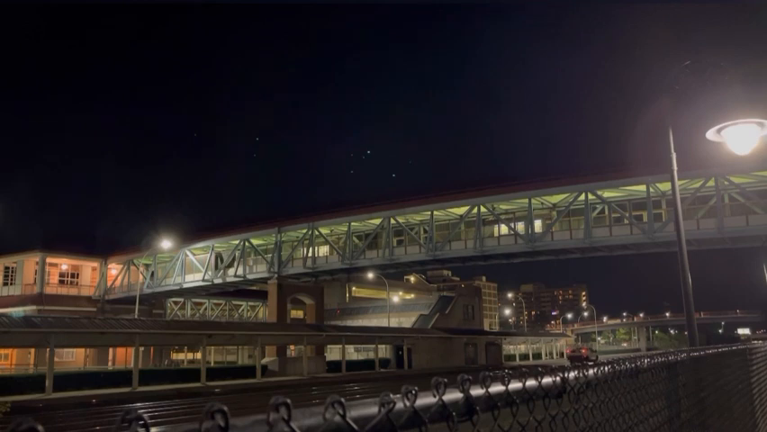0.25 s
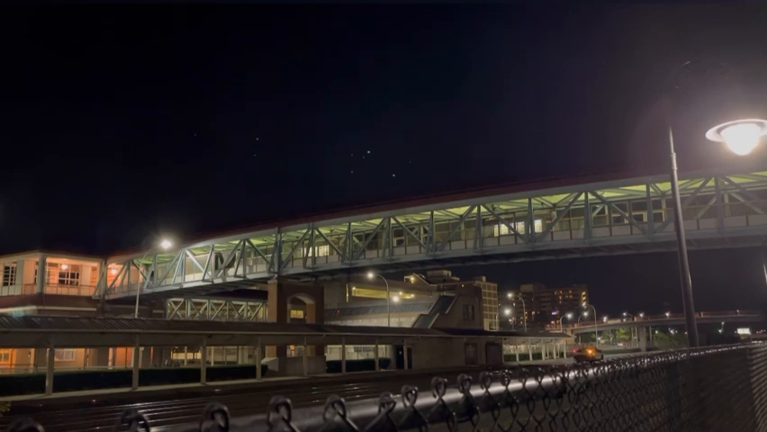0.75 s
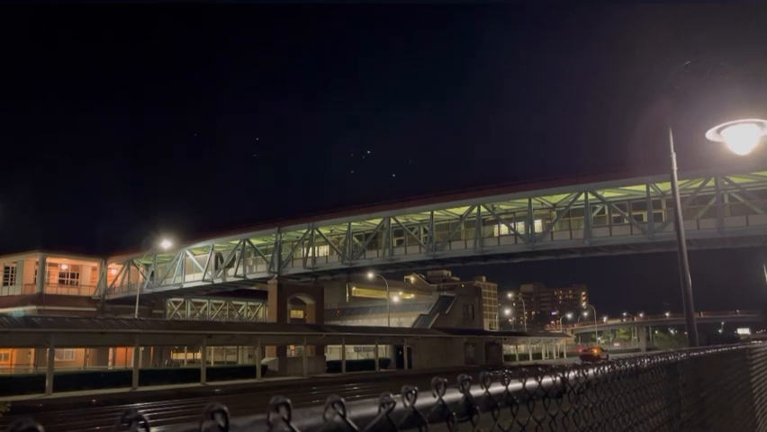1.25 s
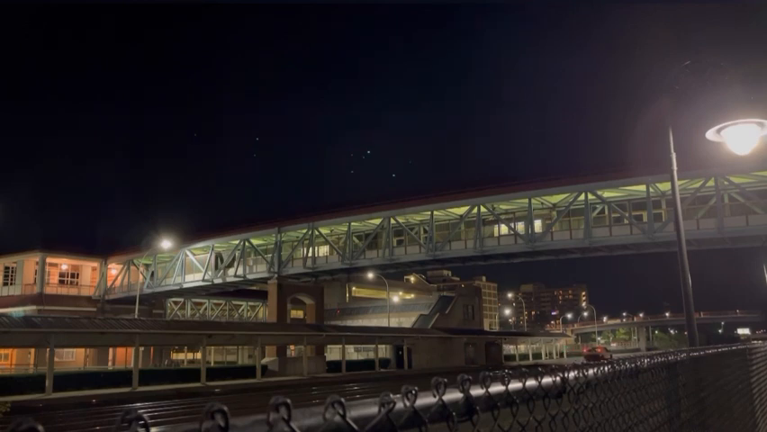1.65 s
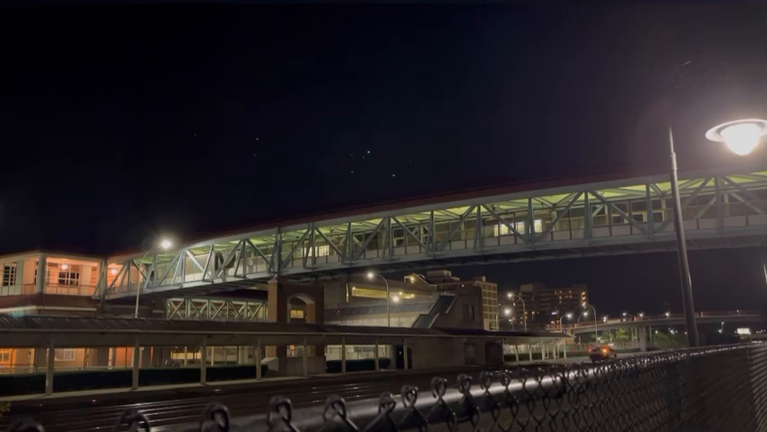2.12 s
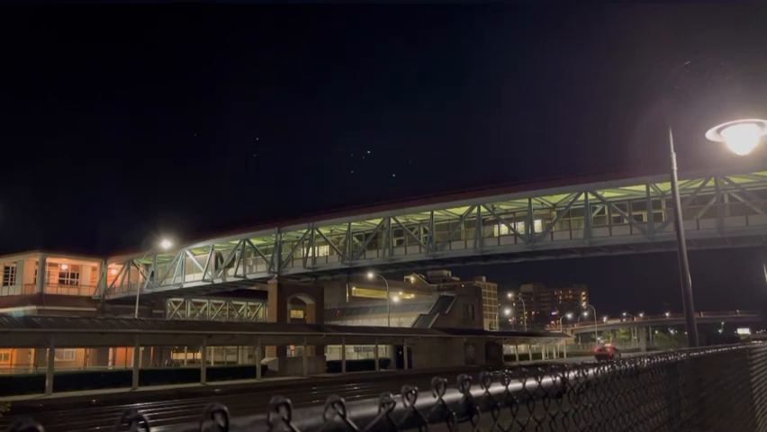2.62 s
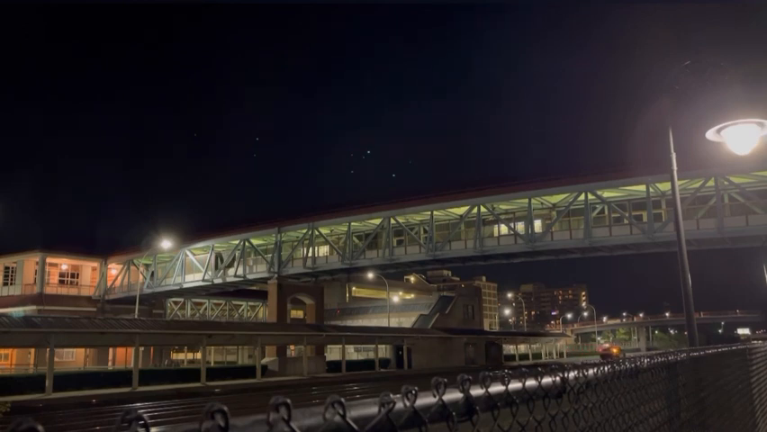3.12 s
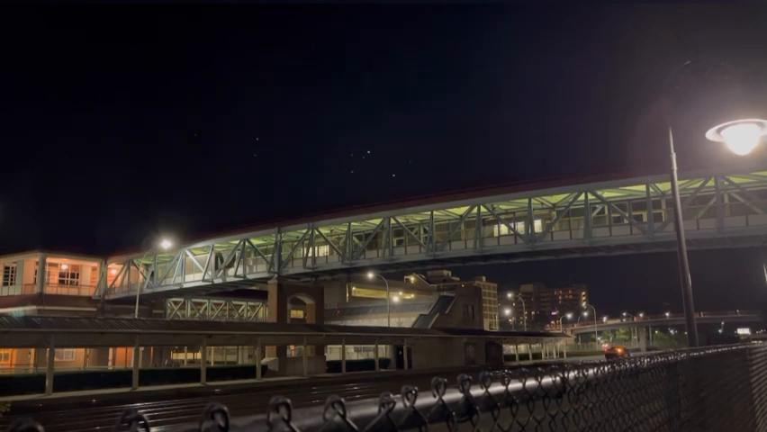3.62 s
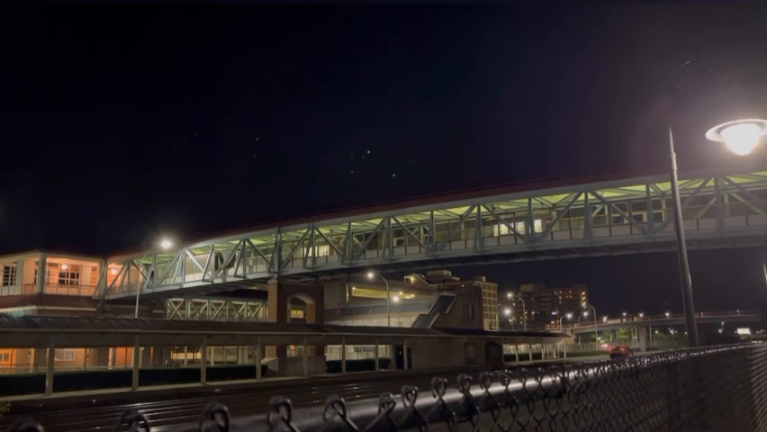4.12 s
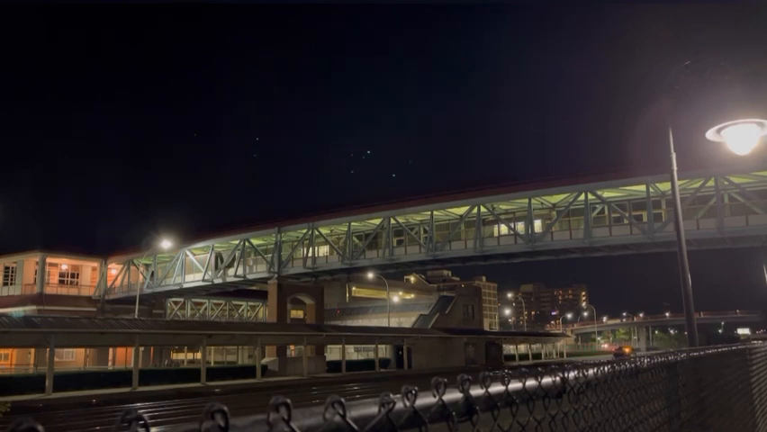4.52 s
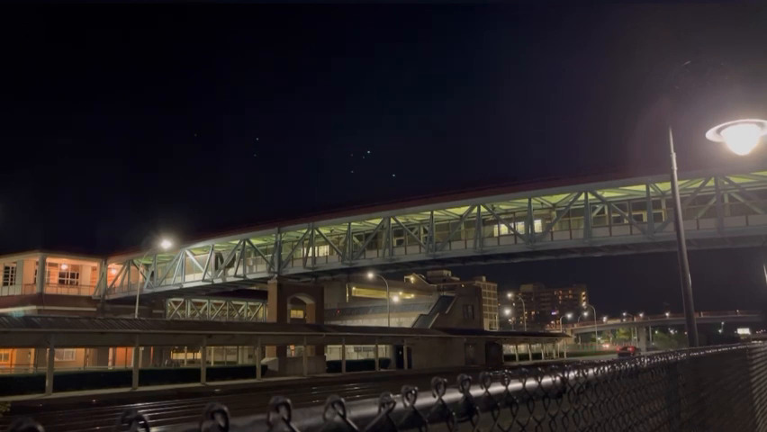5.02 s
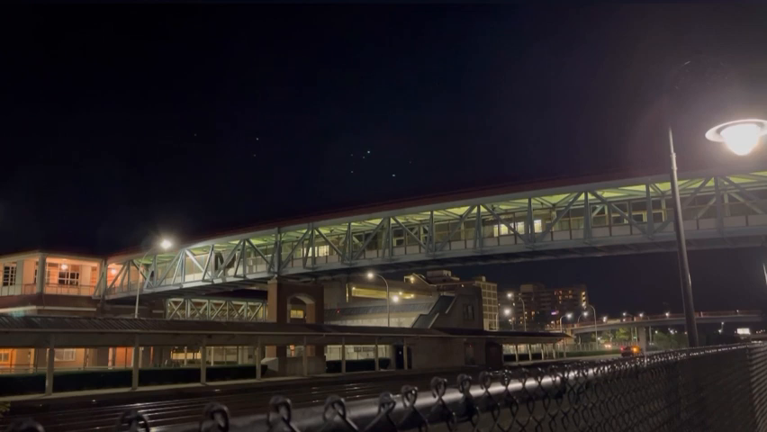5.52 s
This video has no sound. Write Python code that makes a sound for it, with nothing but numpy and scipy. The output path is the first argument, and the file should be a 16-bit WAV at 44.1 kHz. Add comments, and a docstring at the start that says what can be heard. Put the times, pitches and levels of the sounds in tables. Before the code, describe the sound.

At night beside a rail yard, a katydid rasps fast and steadily, a cricket chirps in threes, low town rumble throbs, and one sharp snap cracks.

```python
"""Night insects beside a rail yard

A katydid rasps steadily and a field cricket chirps in threes: wing stridulation, clicks or a tone under a stroke.
A second katydid, a far cricket, a buzz, a trill and choruses, also by resonance or tone, fill the gaps.
Small snaps, one of them loud, ring modes close by; two low beating tones are sines with a weak harmonic.
A faint whine of narrow-band noise lies in the town's rumble of shaped noise."""
import sys
import numpy as np
from scipy import signal
from scipy.fft import rfft, irfft
from scipy.io import wavfile
from scipy.ndimage import uniform_filter1d

SR = 44100
rng = np.random.default_rng(int(sys.argv[2]) if len(sys.argv) > 2 else 0)


def gain_from_decibels(decibels):
    """Convert decibel values to linear amplitude factors."""
    exponent = np.asarray(decibels, float) / 20
    return 10 ** exponent


def waveform_to_disk(signal):
    """Save audio, clipped to [-1, 1], as 16-bit WAV at the path in sys.argv[1]."""
    frames = np.transpose(np.atleast_2d(signal))
    scaled = np.clip(frames, -1, 1) * 32767
    samples = np.round(scaled).astype(np.int16)
    wavfile.write(sys.argv[1], SR, samples)


N = 253575
TIME = np.arange(N) / SR   # s

# near katydid's tempo: t/s, wing strokes per second
KATYDID_TEMPO = [(0, 13.22), (.56, 12.53), (1.73, 13.38), (2.34, 12.66), (2.77, 13.6), (2.83, 12.91),
                 (4.07, 12.75), (4.09, 13.21), (4.81, 12.8), (5.75, 13.04)]
# near katydid's loudness, before the stroke shape: t/s, level/dB
KATYDID_EFFORT = [(0, -68), (.5, -57.5), (1.5, -61), (2.15, -58), (2.7, -60), (3.05, -58.5), (3.75, -62.5),
                  (4.45, -58), (5, -59.5), (5.45, -56.5), (5.75, -60.5)]
# swell and fall of one katydid stroke: t/s from the peak, level/dB
STROKE_SHAPE = [(-.024, -21), (-.013, -1), (0, 4.5), (.01, -1), (.02, -11), (.034, -13), (.045, -34)]
# near katydid's wing resonances: f/Hz, width of one pass/Hz, relative level/dB
KATYDID_WING = [(9160, 320, -15), (9890, 240, -7.5), (10670, 1400, -0.5), (11000, 350, 4.5),
                (11800, 130, -7), (12740, 1400, -19)]
# a second katydid's lone rasps: t/s of the peak, level/dB before the stroke shape, length as a share of a stroke
RASPS = [(.288, -54.5, 1.26), (3.716, -58.5, 1.48), (3.79, -64, 1.1), (4.68, -63, 1.17)]
# second katydid's wing resonances: f/Hz, width of one pass/Hz, relative level/dB
RASP_WING = [(6870, 293, -7), (8720, 1700, 8.5), (9800, 1900, 7.5)]
# more katydids behind the near one, blurred to a hiss: f/Hz, width of one pass/Hz, relative level/dB
HISS_BANDS = [(9600, 980, -6), (10300, 830, 5.5), (11060, 650, 5)]
# near cricket's chirps: t/s of the middle syllable, its level/dB before the syllable shape, gain per syllable/dB
CHIRPS = [(.293, -45, 2), (.683, -47, 3.5), (1.144, -44.5, 0.5), (1.594, -46, 3.2), (2.005, -44, -1.5),
          (2.427, -46, 0), (2.805, -46.5, 1.5), (3.337, -45, 3), (3.827, -47, 3), (4.277, -47, 3.5),
          (4.698, -45.5, 1.5), (5.113, -45.5, 3), (5.576, -46, 1)]
# swell and pitch of one cricket syllable: t/s from the peak, level/dB, f/Hz before shift and wander
SYLLABLE = [(-.018, -25, 4830), (-.012, -23, 4880), (-.002, -3, 4830), (.003, -6.5, 4720), (.008, -7, 4665),
            (.012, -19, 4653)]
# a cricket further off: t/s of the peak, level/dB before the syllable shape
FAR_SYLLABLES = [(.586, -60), (.62, -58), (.95, -64), (.99, -62), (1.25, -53.5), (1.665, -56), (3.133, -60),
                 (3.178, -59), (3.217, -60), (3.966, -59.5), (4.355, -57), (4.395, -59), (4.8, -59),
                 (5.2, -54), (5.442, -57), (5.478, -58), (5.7, -58.5), (5.742, -58)]
# small snaps nearby: t/s, level/dB before the mode levels
SNAPS = [(4.092, -44), (4.6316, -17), (4.6388, -33)]
# modes rung by a snap: f/Hz, relative level/dB, 60 dB decay time/s, left minus right/dB
SNAP_MODES = [(1470, -15, 0.011, 14), (1770, -22.5, 0.027, 16), (2980, -7.5, 0.0092, 6),
              (3880, -0.5, 0.004, -1.5), (4810, 8, 0.0076, -7), (5776, 10, 0.0071, -10),
              (6430, 17.5, 0.0022, -13), (7580, 7, 0.0025, -13), (10200, 12.5, 0.0031, -6),
              (11300, -2, 0.0045, 8)]
# buzzing insect's wing resonances: f/Hz, width of one pass/Hz, relative level/dB
BUZZ_WING = [(6703, 390, 0.5), (6945, 110, -3)]
# trilling insect's wing resonances: f/Hz, width of one pass/Hz, relative level/dB
TRILL_WING = [(7950, 500, -3), (8235, 160, 0), (8820, 170, -7)]
# trilling insect's loudness: t/s, rms level/dB
TRILL_LEVEL = [(0, -72), (.5, -71.5), (2.91, -74.5), (2.94, -110)]
# far choruses, too many voices to tell apart:
# f/Hz, width of one pass/Hz, level/dB, left minus right/dB, lag of the right/samples, flutter/dB
CHORUS = [(4720, 370, -68, -2.5, -1.36, 1.5), (4470, 150, -75.5, -0.5, -0.87, 3.5),
          (3890, 1040, -69.5, -5.5, 1.55, 1.5)]
# low tone of fixed pitch, perhaps an idling engine: t/s, rms level/dB
STEADY_ENGINE = [(0, -35), (.35, -33.5), (.6, -53), (.9, -35.5), (2.1, -36.5), (2.5, -31), (2.65, -52),
                 (2.9, -28.5), (3.3, -58), (3.8, -76), (4.2, -41.5), (5.1, -39.5), (5.75, -41)]
# low tone of wandering pitch, perhaps another engine: t/s, f/Hz, rms level/dB
HUNTING_ENGINE = [(0, 77, -62), (1, 78.54, -40), (1.499, 76.95, -52), (1.8, 81.7, -46), (2.1, 84.3, -34.5),
                  (2.299, 79.7, -54), (2.5, 83, -49), (2.651, 77, -72), (3.1, 80.86, -40),
                  (3.7, 77.4, -32.5), (3.95, 73.8, -33.5), (4.1, 76.8, -63), (4.6, 74.25, -58),
                  (4.85, 77.8, -35), (5.1, 79.6, -36), (5.75, 74.4, -59)]
# faint wavering tone in the rumble: t/s, rms level/dB
WHINE_LEVEL = [(0, -60), (.8, -51.5), (1.1, -77), (1.9, -78), (2.6, -80), (3.6, -72), (4, -87), (5.75, -59)]
# spectrum of the town's rumble: f/Hz, relative level per Hz/dB
TOWN_SPECTRUM = [(20, -49), (40, -14), (57, 0), (66, -4), (110, -4), (200, -16.5), (308, -19.5),
                 (571, -22.5), (786, -19.5), (1000, -24), (1610, -35.5), (3120, -44.5), (6200, -47.5),
                 (7300, -53.5), (10500, -57.5), (12500, -84)]
# road noise swelling: t/s, relative level/dB
TRAFFIC = [(0, 0), (1.1, 0.5), (1.7, -1), (2.4, 1.5), (3.3, 1.5), (3.8, -1.5), (4.7, -2), (5.2, -0.5),
           (5.75, -0.5)]
# likeness of the rumble's two channels: f/Hz, correlation from 0 to 1
LIKENESS = [(90, 0.98), (200, 0.81), (350, 0.46), (800, 0.59), (1250, 0.1), (2200, 0.58), (3000, 0.17)]
# balance of the rumble: f/Hz, left minus right/dB
LEAN = [(60, -0.5), (270, -1.5), (1500, -2), (2300, -0.6), (3200, -2), (8000, -4)]


def rms_one(x):
    """Normalization: a signal divided by its root mean square has unit rms."""
    return x / np.sqrt(np.mean(x ** 2) + 1e-20)


def in_time(rows):
    """Linear interpolation: each column of a time curve becomes one value a sample."""
    s, *columns = np.transpose(rows)
    return [np.interp(TIME, s, column) for column in columns]


def at_hz(points, hz):
    """Logarithmic frequency: a spectrum is interpolated evenly per octave."""
    table_hz, values = np.transpose(points)
    return np.interp(np.log(hz), np.log(table_hz), values)


def drift(rate_hz):
    """Low-pass noise: a double pole at rate_hz leaves a slow random wander of about unit rms."""
    thinning = 40   # samples per drawn value
    r = np.exp(-2 * np.pi * rate_hz * thinning / SR)
    slow = signal.lfilter([1], [1, -2 * r, r * r], rng.standard_normal(N // thinning + 2002))[2000:]
    return np.interp(np.arange(N) / thinning, np.arange(len(slow)), rms_one(slow))


def resonance(x, hz, width_hz):
    """Resonance: a pole pair selects one frequency, passed twice for steep flanks."""
    r = np.exp(-np.pi * width_hz / SR)
    b = (1 - r * r) / 2 * np.array([1, 0, -1])
    a = [1, -2 * r * np.cos(2 * np.pi * hz / SR), r * r]
    return signal.lfilter(b, a, signal.lfilter(b, a, x))


def wing(modes, teeth_per_s, uneven_db):
    """Stridulation: file teeth caught at random moments ring the wing's wavering resonances, at unit rms."""
    caught = rng.random(N) < teeth_per_s / SR
    teeth = caught * gain_from_decibels(uneven_db * rng.standard_normal(N))
    out = np.zeros(N)
    for hz, width_hz, db in modes:
        clicks = teeth * rng.choice([-1, 1], N) + 1e-18
        out += gain_from_decibels(db + 1.2 * drift(5.5)) * resonance(clicks, hz, width_hz) / np.sqrt(width_hz)
    return rms_one(out)


def strokes(events, shape):
    """Amplitude envelope: a stroke shape is laid at every event, stretched by a third column if there is one."""
    out = np.zeros(N)
    s, db = np.transpose(shape)[:2]
    for peak, level_db, *stretch in events:
        near = slice(max(int((peak - .1) * SR), 0), int((peak + .1) * SR))
        since = (TIME[near] - peak) / np.prod(stretch)   # an empty product is 1
        out[near] += gain_from_decibels(level_db + np.interp(since, s, db, -200, -200))
    return out


def nearest_peak(peaks):
    """Nearest neighbour: each sample belongs to the closest peak, divided at the midpoints."""
    return peaks[np.searchsorted((peaks[1:] + peaks[:-1]) / 2, TIME)]


def placed(x, lean_db, lag, scattered=0):
    """Binaural cues: level and arrival time (samples the right lags) place a source; a share reaches the left late."""
    turn = np.exp(-2j * np.pi * np.arange(N // 2 + 1) / N * lag)
    late = np.roll(x, 313)
    left = np.sqrt(1 - scattered) * x + np.sqrt(scattered) * late
    return np.array([gain_from_decibels(lean_db) * left, irfft(rfft(x) * turn, N)])


def stroke_times():
    """Phase accumulation: a stroke peaks whenever the tempo has run one beat, a hair early or late."""
    first_stroke_s, jitter_s = .0565, .001
    beats = np.cumsum(in_time(KATYDID_TEMPO)[0]) / SR
    beats = beats - np.interp(first_stroke_s, TIME, beats)
    peaks = np.interp(np.arange(int(beats[-1]) + 1), beats, TIME)
    return peaks + jitter_s * rng.standard_normal(len(peaks))


def near_katydid():
    """Stridulation: about 13 strokes a second ring the wing, each sinking in pitch to a closing tick."""
    sink_hz_per_s, sink_s = 20000, .014   # the sink lasts this long either side of a peak
    stop_s, stop_db = .008, 5   # the wing stops this long after the peak
    peaks = stroke_times()
    level_db = rng.normal(0, 1.7, len(peaks))
    stretch = 1 + .1 * rng.standard_normal(len(peaks))
    events = np.transpose([peaks, level_db, stretch])

    since = np.clip(TIME - nearest_peak(peaks), -sink_s, sink_s)
    sink = np.cumsum(sink_hz_per_s * since) / SR   # cycles
    ring = signal.hilbert(wing(KATYDID_WING, teeth_per_s=4000, uneven_db=3.5))
    ring = np.real(ring * np.exp(-2j * np.pi * sink))   # shifts every resonance alike

    stops = np.zeros(N + SR)
    stops[((peaks + stop_s) * SR).astype(int)] = gain_from_decibels(level_db + rng.normal(0, 4.0, len(peaks)))
    tick = resonance(np.eye(1, 200)[0], 11400, 900)
    ticks = gain_from_decibels(stop_db) * np.convolve(stops, tick / tick.max())[:N]
    return gain_from_decibels(in_time(KATYDID_EFFORT)[0]) * (strokes(events, STROKE_SHAPE) * ring + ticks)


def katydid_hiss():
    """Superposition: dense clicks through the wing bands of many katydids blur to a hiss."""
    return gain_from_decibels(-69.5) * wing(HISS_BANDS, teeth_per_s=8000, uneven_db=4.0)


def second_katydid():
    """Stridulation: lone, longer strokes ring the broader resonances of another wing."""
    return strokes(RASPS, STROKE_SHAPE) * wing(RASP_WING, teeth_per_s=4700, uneven_db=2.0)


def katydids():
    """Superposition: the near katydid and the hiss share one direction, the second has its own."""
    main = placed(near_katydid() + katydid_hiss(), 0, 10.65, scattered=0.022)
    return main + placed(second_katydid(), -.7, 11.0, scattered=0.11)


def cricket(syllables, shift_hz, rough_db):
    """Frequency modulation: each syllable is a near sine that swells, sinks in pitch and stops short."""
    s, _, hz = np.transpose(SYLLABLE)
    peaks = np.array(syllables)[:, 0]
    pitch_hz = np.interp(TIME - nearest_peak(peaks), s, hz) + shift_hz + 25 * drift(60.2)
    tone = np.sqrt(2) * np.sin(2 * np.pi * np.cumsum(pitch_hz) / SR)
    return strokes(syllables, SYLLABLE) * tone * gain_from_decibels(rough_db * drift(150))


def syllables_of(chirps):
    """Rhythmic grouping: each chirp unfolds into three syllables that mostly grow louder."""
    lead_s, follow_s, outer_db = 0.0399, 0.0408, -1.9   # the outer two lie a little under the slope
    rows = []
    for s, db, gain_db in chirps:
        rows.append((s - lead_s, db - gain_db + outer_db))
        rows.append((s, db))
        rows.append((s + follow_s, db + gain_db + outer_db))
    return rows


def near_cricket():
    """Tonal stridulation: chirps of three syllables, stronger on the right."""
    song = cricket(syllables_of(CHIRPS), shift_hz=0, rough_db=1.1)
    return placed(song, -4.5, -2.92, scattered=0.043)


def far_cricket():
    """Tonal stridulation: a lower, rougher song among stray notes from further still."""
    faint = np.transpose([rng.uniform(0, N / SR, size=45), rng.normal(-66.0, 1.2, size=45)])   # t/s, level/dB
    syllables = sorted(list(FAR_SYLLABLES) + list(map(tuple, faint)))
    return placed(cricket(syllables, shift_hz=-48.5, rough_db=2.2), -2.2, -1.1, scattered=0.29)


def snaps():
    """Modal excitation: a millisecond of cracking rings modes, the strongest to the right; walls return a hiss."""
    left, right, walls = np.zeros((3, N))
    after = np.arange(round(.12 * SR)) / SR
    cracking = np.clip(after / .0012, 0, 1)   # onset
    ringing = np.maximum(after - .0017, 0)   # s of decay
    for s, peak_db in SNAPS:
        span = slice(round(s * SR), round(s * SR) + len(after))
        for hz, db, t60, lean_db in SNAP_MODES:
            envelope = gain_from_decibels(peak_db - 16 + db - 60 * ringing / t60) * cracking
            tone = np.sin(2 * np.pi * (hz * after + rng.random()))
            rough = uniform_filter1d(rng.standard_normal(len(after)), size=12) * np.sqrt(12)
            ring = envelope * tone * (1 + 0.52 * rough)
            left[span] += gain_from_decibels(lean_db) * ring
            right[span] += ring
        splinter = resonance(rng.standard_normal(len(after)), 6000, 9000)   # bright noise
        crack = gain_from_decibels(peak_db - 15 - 60 * ringing / .03) * cracking * splinter
        left[span] += crack
        right[span] += crack
        hiss = resonance(rng.standard_normal(len(after)), 8200, 4200)
        walls[span] += gain_from_decibels(peak_db - 15.0 - 60 * after / 0.08) * hiss
    direct = np.array([left, placed(right, 0, -1.6)[1]])
    return direct + placed(walls, 1.2, 5.7, scattered=0.31)


def buzzer():
    """Amplitude modulation: a dense wing buzz throbs 3.75 times a second."""
    throb = np.cos(2 * np.pi * 3.75 * (TIME - .2))
    level = gain_from_decibels(-71.5 + 3.5 * throb + .9 * drift(1.5))
    buzz = level * wing(BUZZ_WING, teeth_per_s=3000, uneven_db=0.5)
    return placed(buzz, -2.1, -0.23, scattered=.2)


def triller():
    """Amplitude modulation: a wing beating 56.2 times a second is louder as it closes; the trill breaks off."""
    closing = np.clip(2.2 * np.cos(2 * np.pi * 56.2 * (TIME - .0118)) + .9, .5, 1)
    ring = wing(TRILL_WING, teeth_per_s=5500, uneven_db=-3.5)
    trill = gain_from_decibels(in_time(TRILL_LEVEL)[0]) * rms_one(closing) * ring
    return placed(trill, -0.95, -0.83, scattered=0.22)


def chorus():
    """Superposition: voices too many to tell apart become fluttering bands of noise."""
    out = np.zeros((2, N))
    for hz, width_hz, db, lean_db, lag, flutter_db in CHORUS:
        voices = rms_one(resonance(rng.standard_normal(N), hz, width_hz))
        out += placed(voices * gain_from_decibels(db + flutter_db * drift(19)), lean_db, lag, scattered=0.17)
    return out


def engines():
    """Beats: two low tones with weak second harmonics, one steady and one hunting, interfere."""
    steady = np.full(N, 73.35), in_time(STEADY_ENGINE)[0]   # f/Hz, level/dB
    out = np.zeros(N)
    for hz, db in (steady, in_time(HUNTING_ENGINE)):
        phase = 2 * np.pi * np.cumsum(hz) / SR
        second = gain_from_decibels(-23 + 2.5 * drift(4.6))
        tone = np.sin(phase) + second * np.sin(2 * phase)
        out += gain_from_decibels(db + 0.69 * drift(17.0)) * np.sqrt(2) * tone
    return placed(out, -1.06, -2.8)


def whine():
    """Narrow-band noise: a sharp resonance passed twice makes noise a faint, unsteady tone."""
    tone = rms_one(resonance(rng.standard_normal(N), hz=779, width_hz=24))
    return placed(gain_from_decibels(in_time(WHINE_LEVEL)[0]) * tone, -1.7, -1.6, scattered=0.16)


def town():
    """Partial coherence: shaped noise, alike in both channels by frequency; its tyre roar swells with traffic."""
    hz = np.maximum(np.arange(N // 2 + 1) * SR / N, 1)
    alike = np.clip(at_hz(LIKENESS, hz), 0, 1)
    half_lean = at_hz(LEAN, hz) / 2
    mid, side = rfft(rng.standard_normal((2, N))) * gain_from_decibels(at_hz(TOWN_SPECTRUM, hz))
    common, apart = np.sqrt(1 + alike) * mid, np.sqrt(1 - alike) * side
    pair = np.array([gain_from_decibels(half_lean) * (common + apart), gain_from_decibels(-half_lean) * (common - apart)])
    roar = np.exp(-np.log(hz / 850) ** 2 / 0.64)   # share of each frequency that is tyre roar
    steady, swelling = irfft(pair * (1 - roar), N), irfft(pair * roar, N)
    swell_db = in_time(TRAFFIC)[0] + .7 * drift(3)
    return gain_from_decibels(-40.5) * rms_one(steady + swelling * gain_from_decibels(swell_db))


def scene():
    """Superposition: all sources add linearly at the two microphones."""
    insects = katydids() + near_cricket() + far_cricket() + buzzer() + triller() + chorus()
    return insects + snaps() + engines() + whine() + town()


def roll_off(x):
    """The treble ends steeply here."""
    return signal.sosfilt(signal.butter(12, 13600, fs=SR, output="sos"), x)


def record(dry):
    """Signal chain: the finished mix passes through the last stage to the output."""
    return roll_off(dry)


dry = scene()
out = record(dry)
waveform_to_disk(out)
```